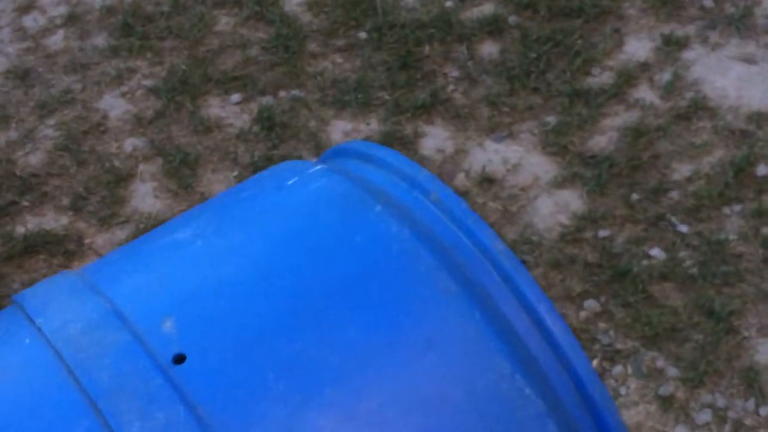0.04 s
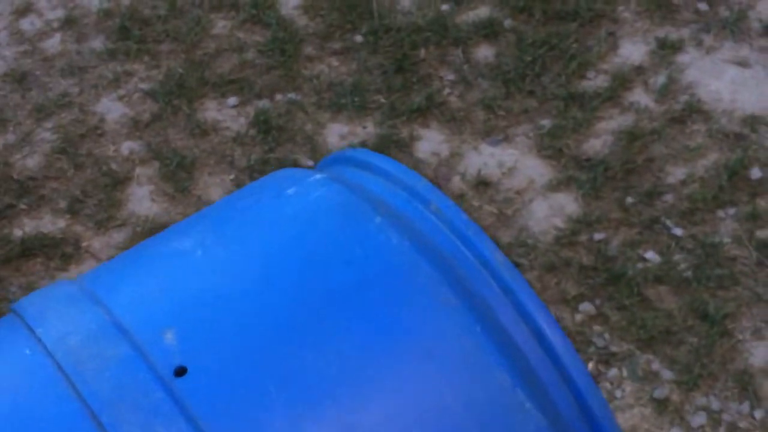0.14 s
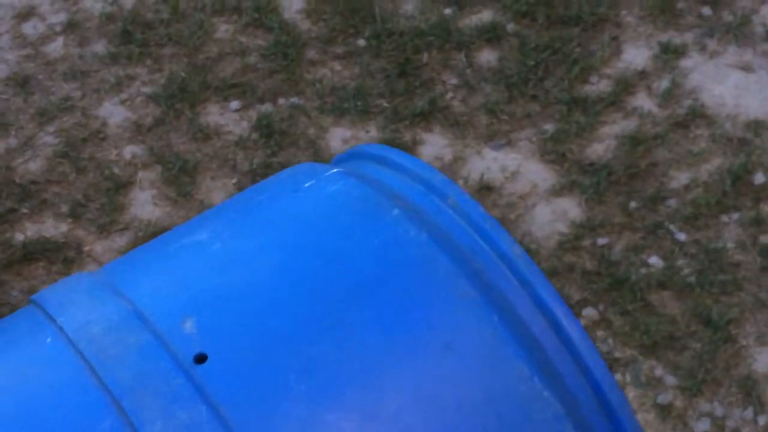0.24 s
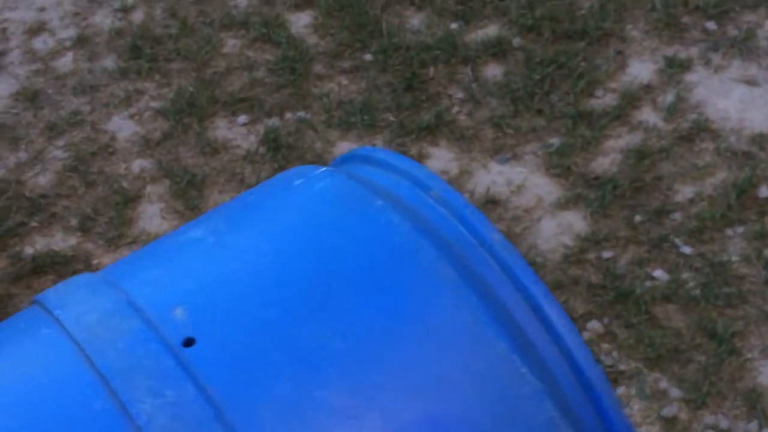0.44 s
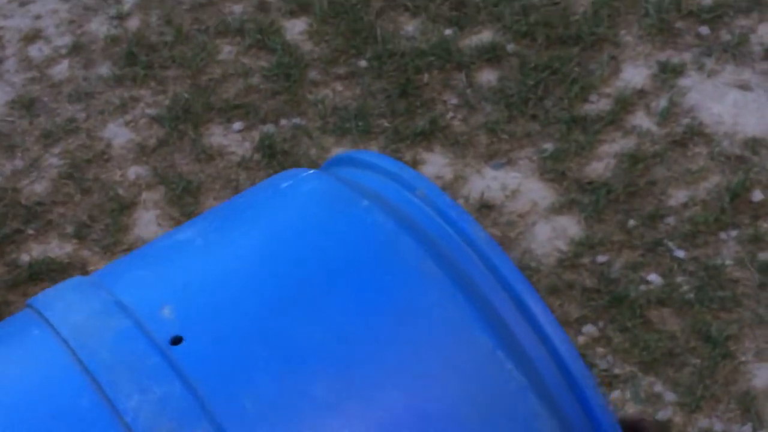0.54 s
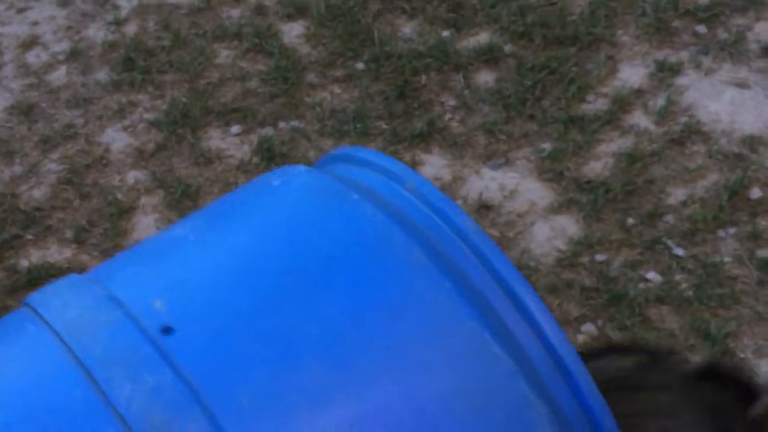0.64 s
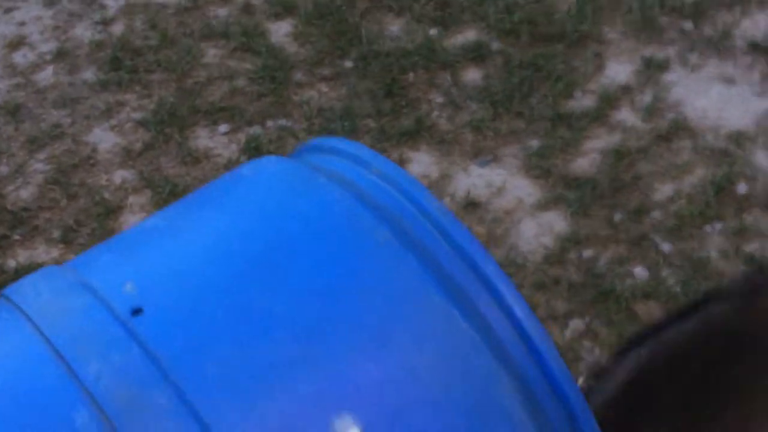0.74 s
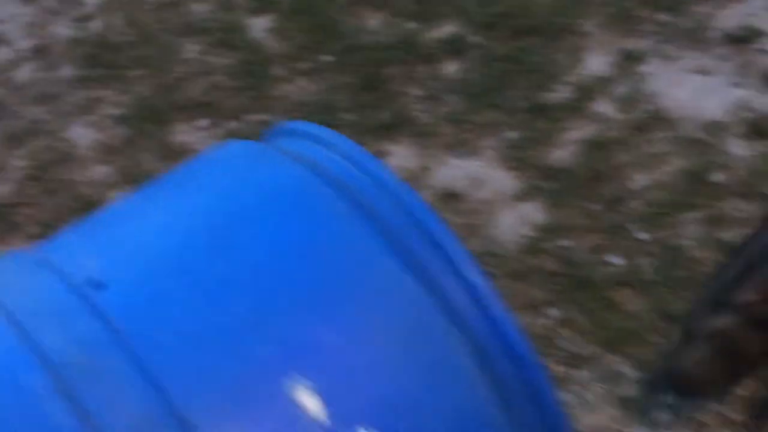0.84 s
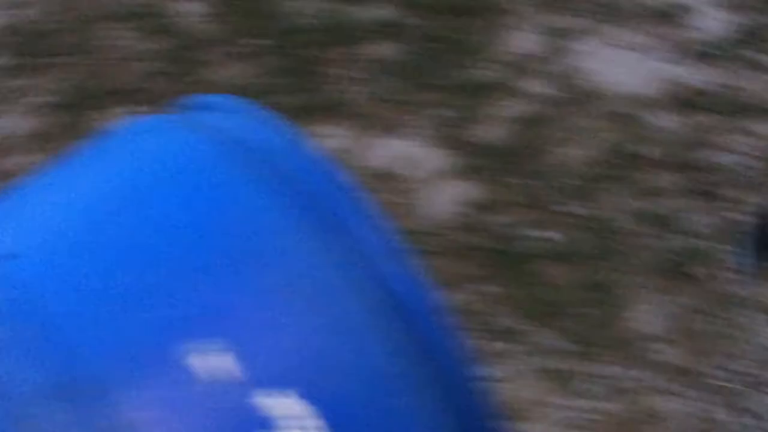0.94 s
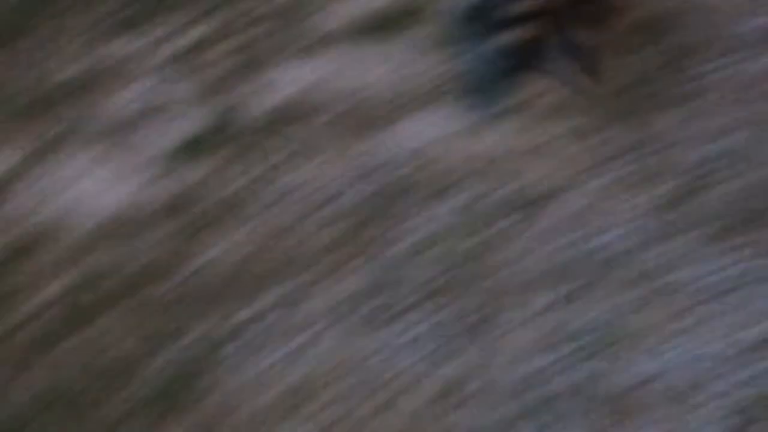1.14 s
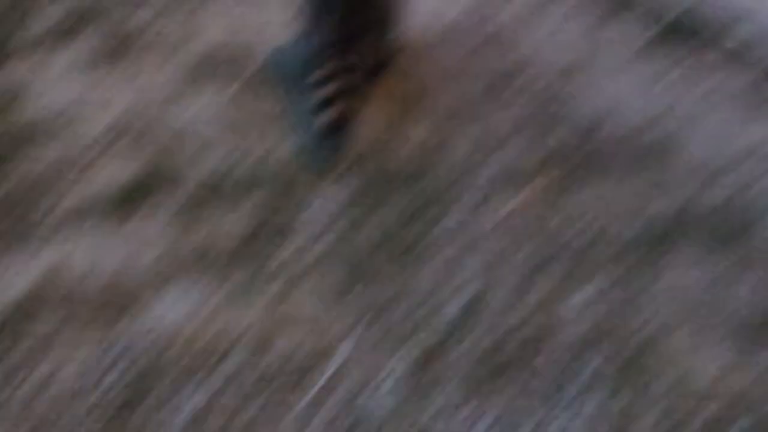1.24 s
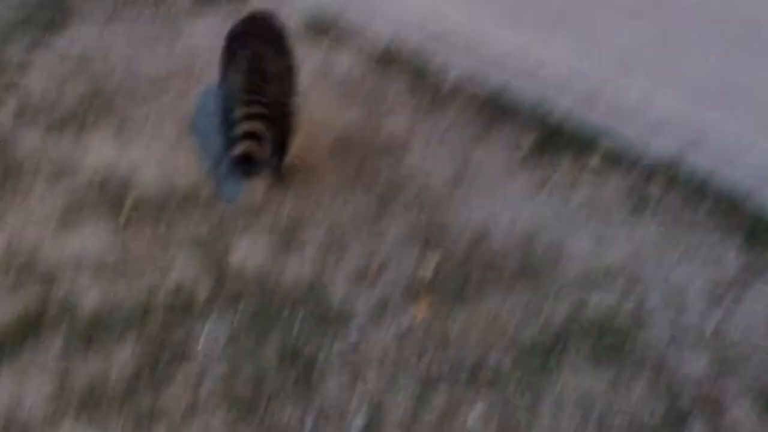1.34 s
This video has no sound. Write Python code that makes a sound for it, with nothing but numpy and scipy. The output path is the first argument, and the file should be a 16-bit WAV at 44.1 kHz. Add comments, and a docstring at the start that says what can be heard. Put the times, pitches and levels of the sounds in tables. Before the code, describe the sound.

Hollow plastic barrel knocks, close and dry, in open air. Low rumble and faint air rush run throughout. At 0.22 s a sharp crack with a deep short boom, then a soft low thump and slight grit crunch at 0.28. Light taps at 0.4 to 0.6. Second, duller knock at 0.64, bright grit tick at 0.71, faint rim ring at 0.74. Small taps and ticks from 0.92 to 1.1, then only rumble.

```python
"""Outdoors: a big plastic garbage can is tipped over.
Two sharp knocks: noise cracks plus decaying wall modes, each with a short hollow boom that swells and dies.
Around them: soft low thumps, light taps ringing part of the wall, a brief rim ring, grit ticks and crunches.
Throughout: shaped noise makes a low rumble, a hum of the can's hollow, a rush of air and a faint hiss."""
import sys
import numpy as np
from scipy import signal
from scipy.fft import rfft, irfft
from scipy.io import wavfile

SR = 44100
rng = np.random.default_rng(int(sys.argv[2]) if len(sys.argv) > 2 else 0)


def file_out(sig):
    """Save sig as 16-bit WAV at sys.argv[1]."""
    # one column per channel
    cols = np.atleast_2d(sig).T
    # limit, then scale
    lim = np.clip(cols, -1, 1)
    pcm = np.round(lim * 32767).astype(np.int16)
    wavfile.write(sys.argv[1], SR, pcm)


N = 59535
TIME_S, FREQS_HZ = np.arange(N) / SR, np.fft.rfftfreq(N, 1 / SR)

# Outdoor rumble spectrum (frequency [Hz], density [dB per Hz, relative]); level (time [s], level [dB])
RUMBLE_SPECTRUM = [(20, -2), (40, -17.5), (62, 0), (110, -6), (160, -8.5), (250, -21.5), (500, -45.5),
                   (8000, -106)]
RUMBLE_LEVEL = [(.1, -49), (.3, -38), (.42, -42.5), (.47, -56.5), (.52, -44.5), (.74, -44.5), (.82, -49),
                (.9, -46.5), (1.1, -46), (1.2, -42.5), (1.35, -44.5)]
HOLLOW_HZ, HOLLOW_HALF_WIDTH_HZ, HOLLOW_RE_RUMBLE_DB = 86, 18, 0
# Rush of air spectrum (frequency [Hz], density [dB per Hz, relative]); level (time [s], level [dB])
RUSH_SPECTRUM = [(80, -22), (200, 3.5), (420, -1), (900, -11.5), (1600, -19.5), (3000, -29), (8000, -37.5)]
RUSH_LEVEL = [(.15, -59), (.21, -52.5), (.5, -58.5), (.7, -50), (.88, -56.5), (1.0, -51.5), (1.15, -53),
              (1.35, -52.5)]
# Hiss spectrum (frequency [Hz], density [dB per Hz, relative])
HISS_SPECTRUM = [(500, 7.5), (3000, -1), (4700, -19.5), (5500, 5), (6300, -12), (10000, -12), (15000, -25)]
HISS_DB = -73.5
# Thumps as the wall swings back and the can rocks
# (crest time [s], level [dB], frequency [Hz], half length to 1/e [s])
WALL_THUMPS = [(0.193, -32, 88, 0.014), (0.278, -17.5, 61.1, 0.044), (0.378, -32.5, 67, 0.022),
               (0.519, -39, 81, 0.02), (0.579, -38, 78.6, 0.0049), (0.624, -32, 88.4, 0.017),
               (0.711, -20, 85, 0.0063), (.927, -33.5, 83.6, .014), (1, -31, 90.4, 0.016),
               (1.062, -32, 85, 0.011)]
# Knocks (time [s], crack level before trim [dB], crack tilt [dB per octave], boom crest delay [s],
# boom level added to mode level [dB], boom swell [s], boom t60 factor, struck spot [0 or 1])
KNOCK_EVENTS = [(0.2222, -15, 0, .0151, 0.5, 0.017, 0.97, 0),
                (0.642, -16.5, -0.5, .021, -0.5, 0.012, 0.82, 1)]
# Can modes (frequency [Hz], t60 before any factor [s], level struck at spot 0 [dB], at spot 1 [dB])
CAN_MODES = [(67.6, 0.17, -33, -17), (88.3, 0.15, -3.5, -7), (107.5, 0.087, -41, -14.5),
             (162.4, .2, -12.5, -29.5), (208.3, 0.14, -22.5, -16.5), (263.7, 0.18, -36, -33),
             (365.3, 0.16, -27, -26), (390.3, 0.24, -51, -31.5), (440.8, 0.19, -41, -33.5),
             (573, .1, -32.5, -30), (752, .14, -62, -40), (874, 0.17, -35.5, -39), (1104, 0.084, -45, -60),
             (1383, 0.049, -29.5, -67), (1450, 0.039, -56.5, -48)]
BOOM_BELOW_HZ, MODE_RISE_S = 135, 0.0064  # lower modes swell with the whole wall; higher ring from contact
# Shell crack spectrum (frequency [Hz], density [dB per Hz, relative])
CRACK_SPECTRUM = [(150, -4), (400, 2.5), (900, 1), (1400, 1), (2100, -4.5), (3200, -21.5), (5000, -28),
                  (8000, -34), (15000, -50)]
# Shell decay (frequency [Hz], t60 before ring factor [s])
SHELL_DECAY = [(300, 0.29), (1000, 0.076), (2000, 0.057), (4000, 0.11), (12000, 0.044)]
CRACK_TRIM_DB, CRACK_RING = -13, 0.84
CRACK_SNAP_DB, CRACK_SNAP_S = 4, 0.0034  # extra level at the start, and the time it takes to fall to 1/e
SHELL_RISE_S = 0.00051
# Rim scrapes over grit
# (start [s], length [s], level [dB], rise [s], fade per 20 dB [s], tilt [dB per octave])
RIM_SCRAPES = [(0.225, 0.04, -58.5, .004, 0.04, 2.5), (0.278, 0.045, -50, 0.0039, 0.048, -0.2),
               (0.554, 0.036, -62, 0.017, 0.019, 3), (0.64, 0.051, -53.5, 0.0057, 0.096, -4.5),
               (0.707, 0.11, -61, 0.0045, 0.018, -2), (0.912, 0.2, -71, 0.018, 0.14, -0.5)]
# Grit crunch spectrum (frequency [Hz], density [dB per Hz, relative])
GRIT_SPECTRUM = [(400, 5.5), (1200, 3), (2500, 1), (4000, -4.5), (6000, 0), (8300, -0.5), (10500, -9),
                 (15000, -13.5)]
GRAINS_PER_S, GRAIN_SPREAD_DB = 1700, 2.5
# Grit ticks (time [s], level before trim [dB], tilt [dB per octave])
GRIT_TICKS = [(.2535, -29, 18), (0.387, -36, 4.5), (0.405, -47, -5), (.518, -47, 3), (0.5628, -47, 0),
              (.572, -43, 0), (0.583, -43, -5), (0.59, -40, -0.5), (0.6412, -30, -13), (0.7086, -16.5, 4.6),
              (0.9242, -43, -4), (0.9759, -40, 3), (1.0272, -39, -6), (1.0353, -37.5, 6),
              (1.065, -44.5, -2), (1.085, -43, -1), (1.097, -44.5, -4)]
# Tick spectrum (frequency [Hz], density [dB per Hz, relative])
TICK_SPECTRUM = [(1000, -23), (2800, -1), (4800, 0), (8000, 3), (11000, -2.5), (15000, -9.5)]
TICK_TRIM_DB, TICK_T60_S = -16, 0.0092
TICK_TAIL_RE_NOISE_DB, TICK_TAIL_T60_S = -12, 0.068
TICK_SNAP_RE_NOISE_DB, TICK_SNAP_DELAY_S = 17, 0.00068
# Light shell taps (time [s], level before trim [dB], centre [Hz], width [octaves], ring factor)
SHELL_TAPS = [(.391, -29, 490, .45, 0.78), (0.4031, -28.5, 1130, 0.34, 1.56), (.481, -43.5, 921, 0.42, 1.1),
              (.5505, -41, 787, 0.46, 3.1), (0.597, -36.5, 810, 0.58, 1.7), (0.61, -25.5, 1080, 0.38, 1.26),
              (.673, -24.5, 470, 0.89, 1.29), (0.742, -41, 470, 0.43, 0.77), (0.9224, -26, 660, 0.75, 0.6),
              (.979, -34, 570, 0.98, 0.41), (1.009, -29, 730, 0.42, 0.83), (1.036, -37, 600, 1, 0.53)]
TAP_TRIM_DB, TAP_RISE_S = -13.5, 0.00057
TAP_MODES_RE_SHELL_DB, TAP_MODES_RING = -5.5, 0.69
# Brief rim ring (time [s], level [dB], frequency [Hz], t60 [s])
RIM_RING_EVENT = (.741, -42, 452, .34)
CUTOFF_HZ = 15450


def amp(db):
    """Decibels to gain."""
    return 10 ** (np.asarray(db) / 20)


def unit(x):
    """Scales to an rms of 1."""
    return x / np.sqrt(np.mean(x ** 2) + 1e-20)


def read(points, hz):
    """Interpolates a table along log frequency."""
    f, value = np.transpose(points)
    return np.interp(np.log(hz + 1), np.log(f + 1), value)


def tilted(points, tilt_db):
    """Adds a slope in dB per octave to a spectrum, above its second point."""
    octaves = np.log2(np.maximum(FREQS_HZ, points[1][0]))
    return read(points, FREQS_HZ) + tilt_db * octaves


def colour(x, db):
    """Filters x by a spectrum, then sets its rms to 1."""
    return unit(irfft(rfft(x) * amp(db), N))


def noise(db):
    """Gaussian noise with a given spectrum, at an rms of 1."""
    return colour(rng.standard_normal(N), db)


def level_gain(points):
    """Gain over time from a level table."""
    return amp(np.interp(TIME_S, *np.transpose(points)))


def rise(time_constant_s):
    """Exponential onset from 0 towards 1."""
    return 1 - np.exp(-TIME_S / time_constant_s)


def add(mix, start_s, sound):
    """Mixes a sound in at a start time."""
    part = mix[max(round(start_s * SR), 0):]
    part += sound[:len(part)]


def outdoors():
    """Steady noises: rumble and the hollow's resonance share one level curve; air rush and hiss lie above."""
    detune = (FREQS_HZ - HOLLOW_HZ) / HOLLOW_HALF_WIDTH_HZ
    hollow = noise(-20 * np.log10(1 + detune ** 2))
    rumble = noise(read(RUMBLE_SPECTRUM, FREQS_HZ))
    low = level_gain(RUMBLE_LEVEL) * (rumble + amp(HOLLOW_RE_RUMBLE_DB) * hollow)
    rush = level_gain(RUSH_LEVEL) * noise(read(RUSH_SPECTRUM, FREQS_HZ))
    hiss = amp(HISS_DB) * noise(read(HISS_SPECTRUM, FREQS_HZ))
    return low + rush + hiss


def thumps():
    """Slow wall flexing: low cosines under Gaussian envelopes, with no click."""
    out = np.zeros(N)
    for crest_s, db, hz, half_s in WALL_THUMPS:
        t = TIME_S - crest_s
        out += amp(db) * np.exp(-(t / half_s) ** 2) * np.cos(2 * np.pi * hz * t)
    return out


def shell(db, ring):
    """Dense, damped wall modes: noise with a sharp start, each band dying at its own speed."""
    spectrum, out = rfft(noise(db)), np.zeros(N)
    centres_hz = np.geomspace(200, 12800, 7)
    for hz, weights in zip(centres_hz, np.eye(len(centres_hz))):
        # overlapping triangular bands sum to the full spectrum
        band_gain = read(np.c_[centres_hz, weights], FREQS_HZ)
        band = irfft(spectrum * band_gain, N)
        out += band * amp(-60 * TIME_S / (ring * read(SHELL_DECAY, hz)))
    return out * rise(SHELL_RISE_S)


def knocks():
    """Each knock cracks the shell and rings its modes; the wall gives way and its boom swells and dies."""
    out = np.zeros(N)
    for start_s, crack_db, tilt_db, crest_s, boom_db, swell_s, ring, spot in KNOCK_EVENTS:
        snap_db = CRACK_SNAP_DB * np.exp(-TIME_S / CRACK_SNAP_S)
        crack = shell(tilted(CRACK_SPECTRUM, tilt_db), CRACK_RING)
        add(out, start_s, amp(crack_db + CRACK_TRIM_DB + snap_db) * crack)
        from_crest = TIME_S - crest_s
        before, after = np.minimum(from_crest, 0), np.maximum(from_crest, 0)
        swelling = np.exp(-(before / swell_s) ** 2) * rise(SHELL_RISE_S)
        for hz, t60_s, *spot_db in CAN_MODES:
            if hz < BOOM_BELOW_HZ:
                envelope = swelling * amp(boom_db - 60 * after / (t60_s * ring))
                mode = envelope * np.cos(2 * np.pi * hz * from_crest)
            else:
                envelope = rise(MODE_RISE_S) * amp(-60 * TIME_S / t60_s)
                mode = envelope * np.sin(2 * np.pi * hz * TIME_S)
            add(out, start_s, amp(spot_db[round(spot)]) * mode)
    return out


def scrapes():
    """The rim scrapes over grit: random grains of mixed size and sign crunch as filtered impulses."""
    out = np.zeros(N)
    for start_s, length_s, db, rise_s, fade_s, tilt_db in RIM_SCRAPES:
        fade_db = -20 * np.maximum(TIME_S - length_s, 0) / fade_s
        level = np.minimum(TIME_S / rise_s, 1) * amp(db + fade_db)
        size_db = GRAIN_SPREAD_DB * np.minimum(rng.exponential(1, N), 4)
        sizes = amp(size_db) * rng.choice([-1, 1], N)
        grains = sizes * (rng.random(N) < GRAINS_PER_S / SR)
        add(out, start_s, level * colour(grains, tilted(GRIT_SPECTRUM, tilt_db)))
    return out


def ticks():
    """Single stones tick: one band-limited impulse plus noise with a fast and a slow decay."""
    out = np.zeros(N)
    tail = amp(TICK_TAIL_RE_NOISE_DB - 60 * TIME_S / TICK_TAIL_T60_S)
    fade = amp(-60 * TIME_S / TICK_T60_S) + tail
    snap = amp(TICK_SNAP_RE_NOISE_DB) * np.sinc((TIME_S - TICK_SNAP_DELAY_S) * SR)
    for start_s, db, tilt_db in GRIT_TICKS:
        source = snap + fade * rng.standard_normal(N)
        response = unit(amp(tilted(TICK_SPECTRUM, tilt_db)))
        tick = irfft(rfft(source) * response, N)
        add(out, start_s, amp(db + TICK_TRIM_DB) * tick)
    return out


def region(hz, centre_hz, width_octaves):
    """Excitation in dB at each frequency, falling away from the contact's centre."""
    octaves = np.log2((hz + 1) / centre_hz) / width_octaves
    return -20 * np.log10(1 + octaves ** 2 / 2 + octaves ** 4 / 10)


def taps():
    """Light contacts ring one frequency region of the shell: dense noise plus clear modes."""
    out = np.zeros(N)
    for start_s, db, centre_hz, width_octaves, ring in SHELL_TAPS:
        clear = np.zeros(N)
        for hz, t60_s, *_ in CAN_MODES:
            decay_db = -60 * TIME_S / (t60_s * ring * TAP_MODES_RING)
            phase = 2 * np.pi * (hz * TIME_S + rng.random())
            clear += amp(region(hz, centre_hz, width_octaves) + decay_db) * np.sin(phase)
        dense = shell(region(FREQS_HZ, centre_hz, width_octaves), ring)
        tap = dense + amp(TAP_MODES_RE_SHELL_DB) * clear
        add(out, start_s, amp(db + TAP_TRIM_DB) * tap * rise(TAP_RISE_S))
    return out


def rim_ring():
    """The rim rings briefly as one decaying sine."""
    out = np.zeros(N)
    start_s, db, hz, t60_s = RIM_RING_EVENT
    add(out, start_s, amp(db - 60 * TIME_S / t60_s) * np.sin(2 * np.pi * hz * TIME_S))
    return out


def scene():
    """Sums the open air, the can and the grit into one channel."""
    can = thumps() + knocks() + taps() + rim_ring()
    grit = scrapes() + ticks()
    return (outdoors() + can + grit)[None]


def record(dry):
    """Band limit of the recorder: a linear-phase low-pass."""
    lowpass = signal.firwin(401, CUTOFF_HZ, window=("kaiser", 8), fs=SR)
    return signal.oaconvolve(dry, lowpass[None], "same")


dry = scene()
out = record(dry)
file_out(out)
```